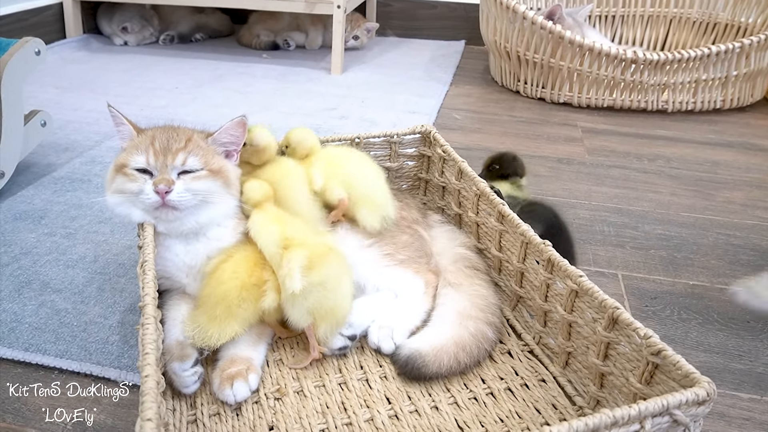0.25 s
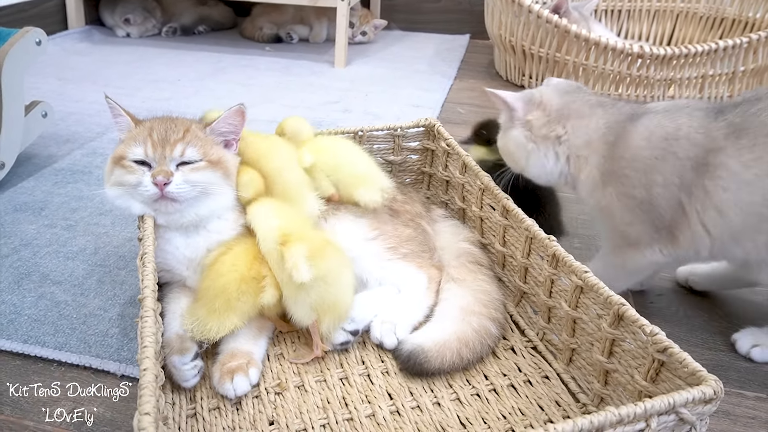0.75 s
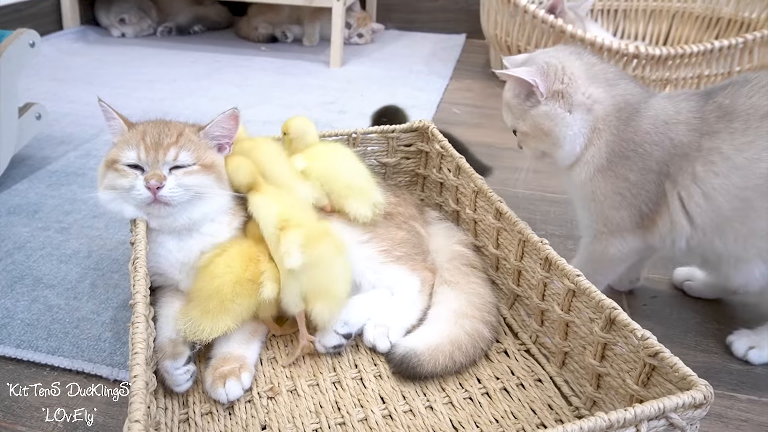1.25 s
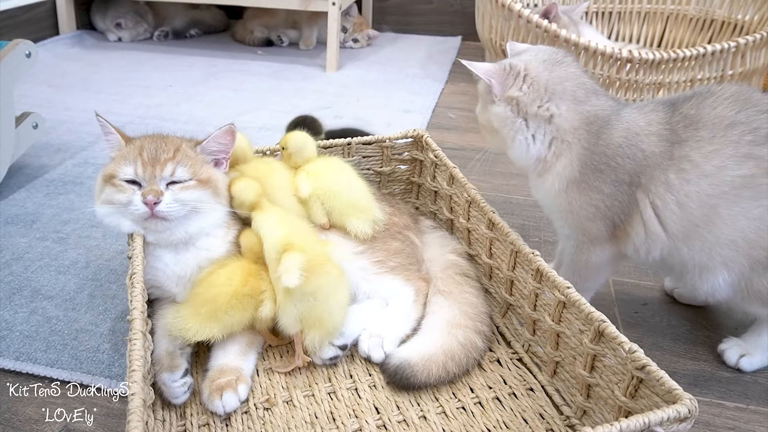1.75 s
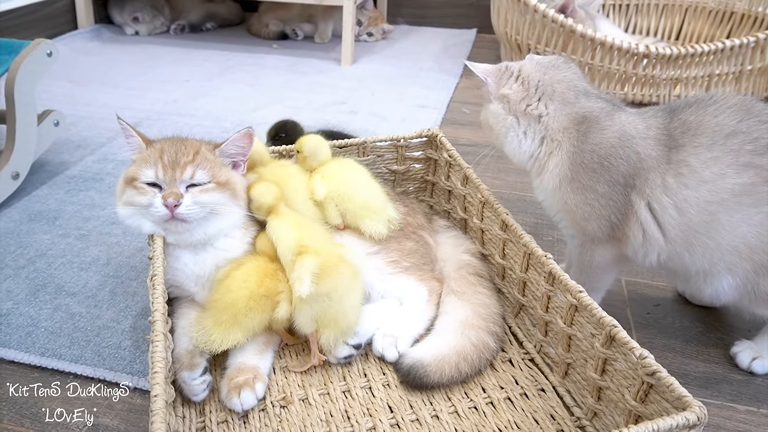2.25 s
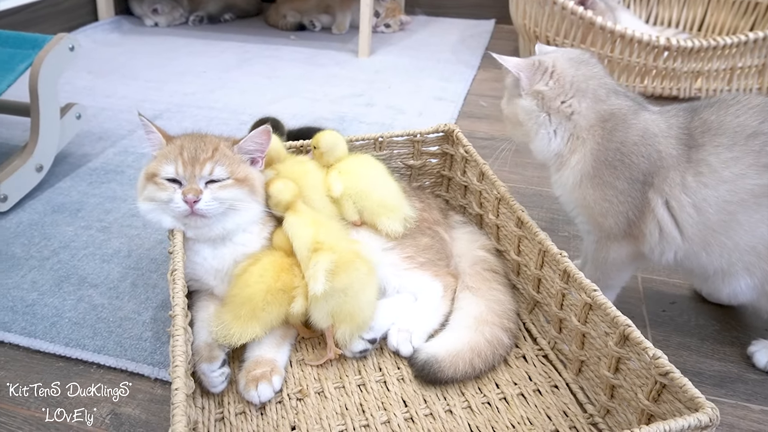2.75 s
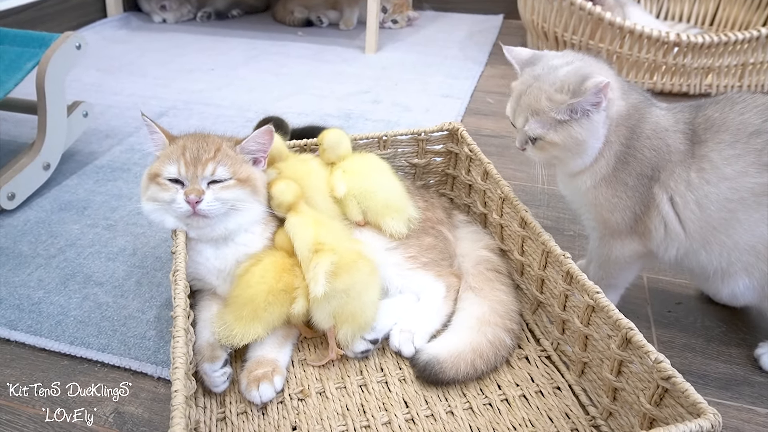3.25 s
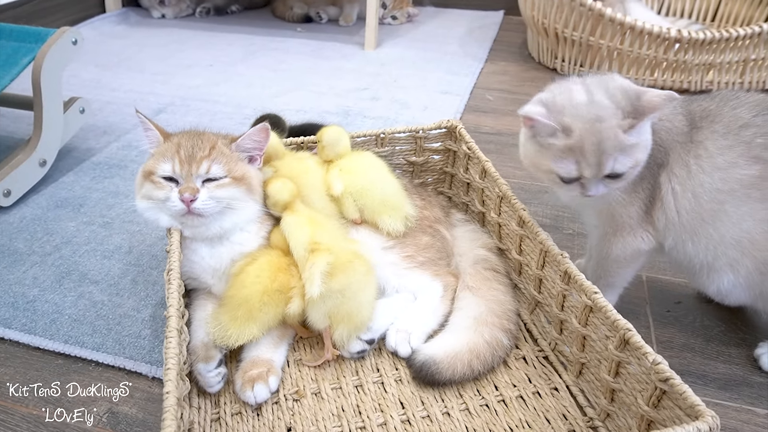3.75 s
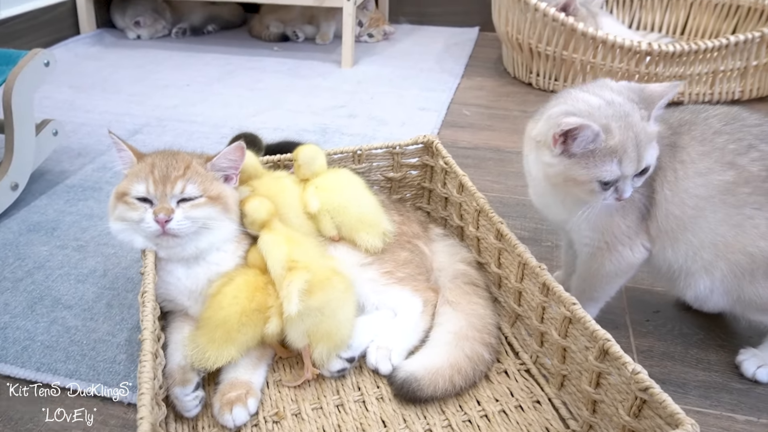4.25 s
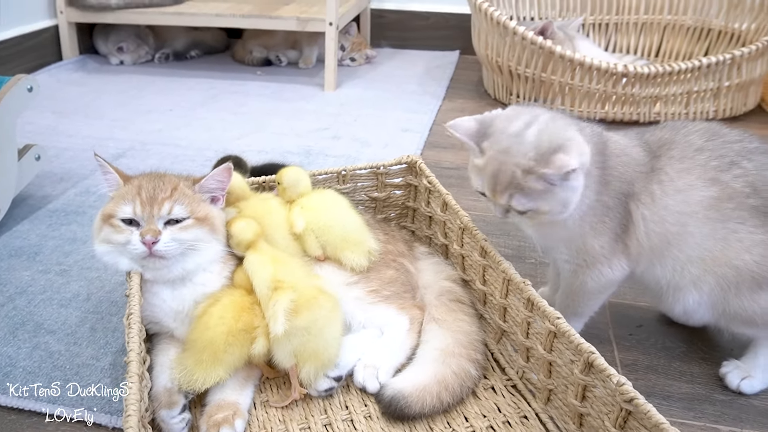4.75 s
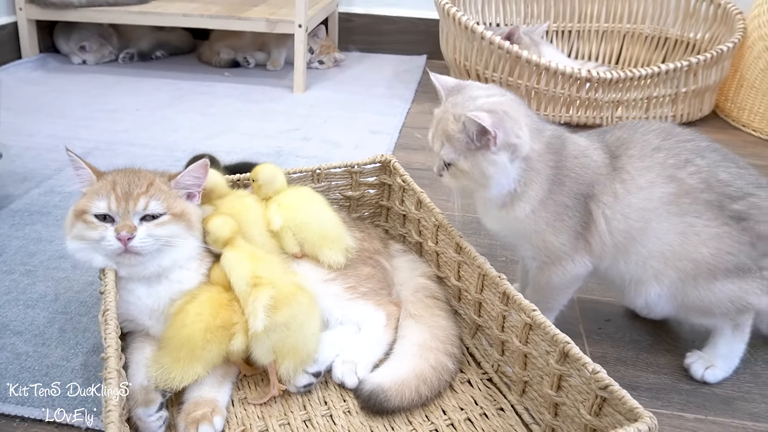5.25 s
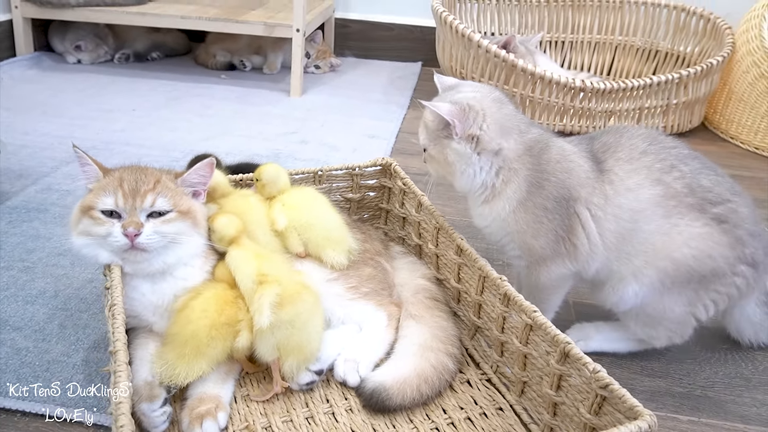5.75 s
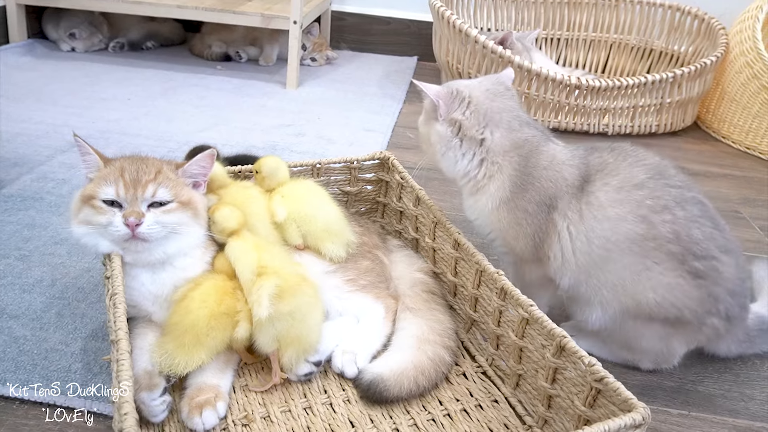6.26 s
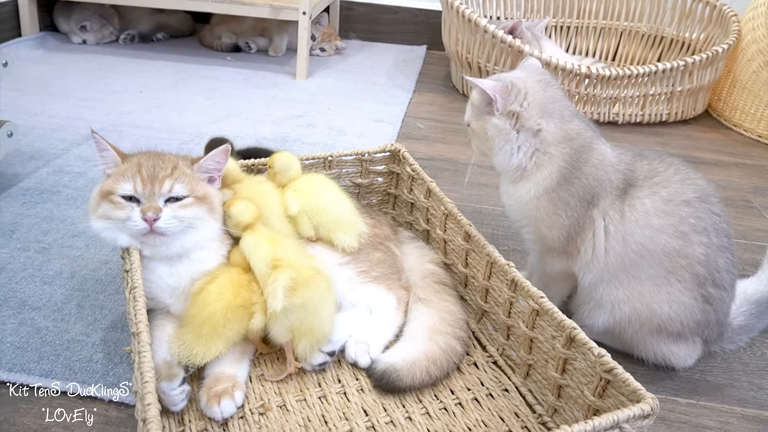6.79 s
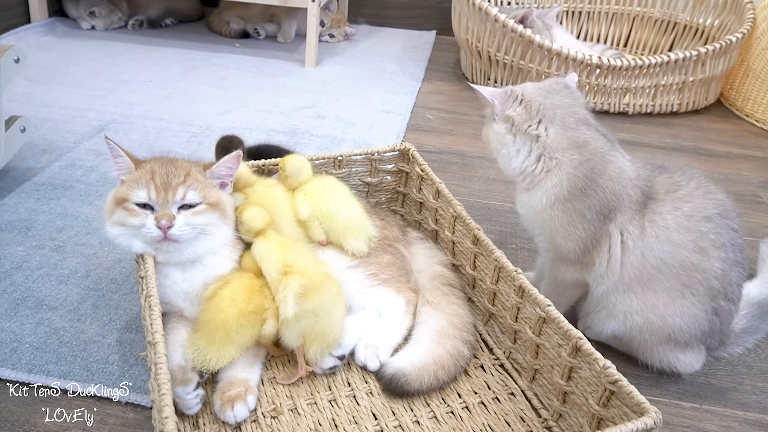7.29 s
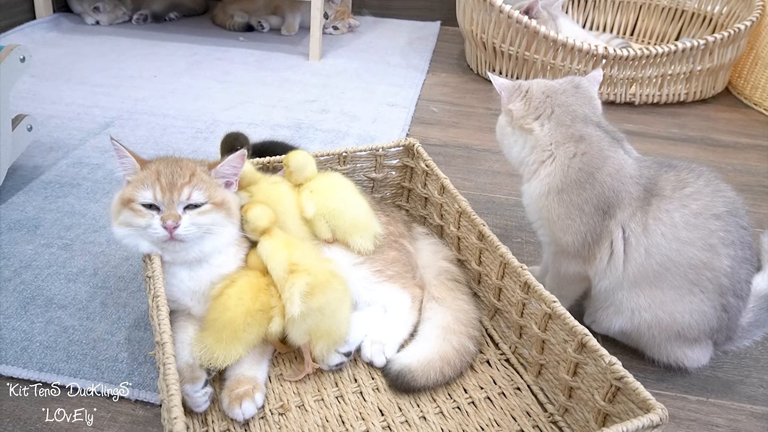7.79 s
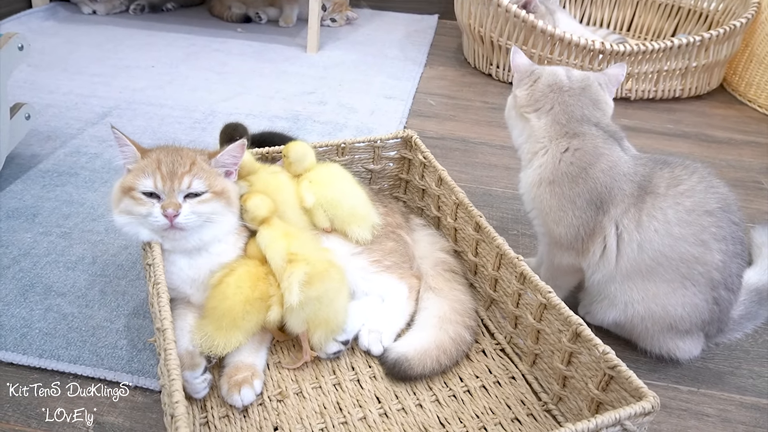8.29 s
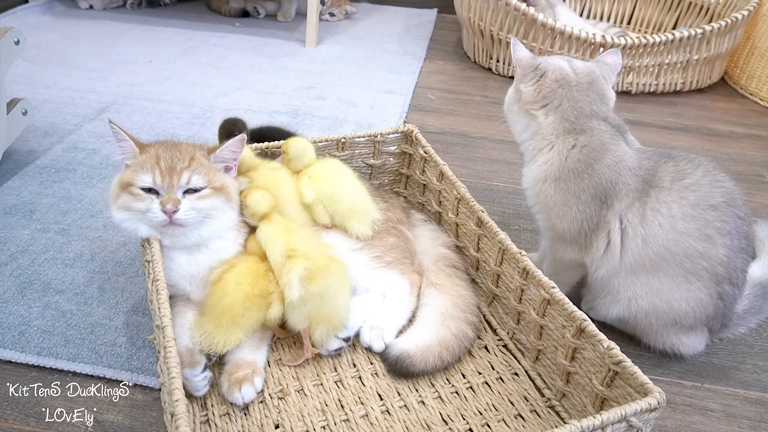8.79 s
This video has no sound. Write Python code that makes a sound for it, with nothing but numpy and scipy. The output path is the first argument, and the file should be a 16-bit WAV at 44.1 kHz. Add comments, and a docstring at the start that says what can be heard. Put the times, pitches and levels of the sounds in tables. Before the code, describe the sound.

In a hard-floored room with a low wavering hum, ducklings give tiny chirps over soft rustling. One hidden behind a wicker basket then peeps about five times a second, faint at first, soon loud, mostly heard as echo. Around six seconds it pauses for rustles, a dull double clatter and a thin jingle, then resumes. A sharp knock and more tinkling come near the end. The stereo microphone hears little direct peeping.

```python
"""A low wavering hum, a rumble and a hush fill a hard-floored room, with feet and fur stirring as flickering noise.
Ducklings chirp at once, in short hooks of pitch, and wicker and claws tick as brief band-limited pushes.
Then a duckling behind a wicker basket peeps in two runs, as falling whistles with a breathy haze, mostly echo.
Scrapes of banded noise and dull decaying knocks join in; between the runs and near the end metal partials jingle,
and between the runs an object clatters twice, as noise ringing its modes."""
import sys
import numpy as np
from scipy import signal
from scipy.fft import rfft, irfft, next_fast_len
from scipy.io import wavfile
from scipy.ndimage import uniform_filter1d

SR = 44100
rng = np.random.default_rng(int(sys.argv[2]) if len(sys.argv) > 2 else 0)


def dump(signal):
    """Clip the signal to [-1, 1] and save it as 16-bit WAV at the path in sys.argv[1]."""
    limited = np.clip(np.atleast_2d(signal).T, -1, 1)
    pcm = np.round(limited * 32767).astype(np.int16)
    wavfile.write(sys.argv[1], SR, pcm)


N = 398207  # samples

# Event levels are those at the source, ahead of the direct and room gains in scene().

# Colour of the hush. Each row: frequency in Hz, relative density in dB per Hz.
HUSH_COLOUR = [(15, -57), (25, -17), (82, -1.5), (145, -3.5), (326, -12), (911, -12), (1940, -27.5),
               (2550, -34), (2760, -26), (3080, -31.5), (4250, -45), (5570, -39.5), (7310, -49),
               (16000, -33)]
HUSH_DB = -65  # mean level, wavering

# Slow levels of the low sounds. Each row: time in seconds, hum level in dB, rumble level in dB.
HUM_LEVELS = [(0, -64.5, -69), (.65, -60, -63.5), (1.1, -60.5, -68), (1.7, -61.5, -63), (2.5, -61.5, -67),
              (3, -65, -64.5), (3.5, -65.5, -66), (5, -71, -68), (5.7, -69.5, -67), (5.9, -61.5, -63),
              (6.5, -74.5, -66), (7.1, -88, -70.5), (7.6, -73.5, -62), (8.35, -64, -68), (9.03, -66, -64.5)]
HUM_HZ = 84  # mean pitch

# Colour of the rumble. Each row: frequency in Hz, relative density in dB per Hz.
RUMBLE_COLOUR = [(80, -15), (150, -1.5), (260, 7.5), (600, -4.5), (1200, -18.5)]

# Steady stirring of feet and fur. Each row: time in seconds, hiss level in dB, scuff level in dB.
STIRRING = [(0, -63, -67.5), (.2, -65.5, -60.5), (.9, -69.5, -70), (1.3, -68.5, -61.5), (2, -72, -65),
            (2.5, -68.5, -70.5), (3.3, -68.5, -67.5), (3.8, -66.5, -70), (4.12, -58.5, -65.5),
            (4.5, -62, -63), (5.1, -66.5, -68), (5.65, -70, -72), (6, -61.5, -61.5), (6.5, -68, -67),
            (7.1, -65.5, -64), (7.7, -76, -64.5), (8.3, -64.5, -64.5), (9.03, -63, -64.5)]

# Single rustles above the stirring. Each row: start in seconds, hiss level in dB, scuff level in dB, hold in seconds.
RUSTLES = [(0.314, -58, -58.5, .03), (0.456, -59, -64, .02), (0.49, -60.5, -60.5, 0.087),
           (0.616, -62, -58.5, 0.047), (1.314, -59, -60, 0.014), (.69, -71, -62, .03),
           (1.482, -61.5, -65, .02), (2.39, -64, -71, .04), (4.764, -69, -73, 0.089),
           (1.74, -66.5, -63.5, 0.13), (2.923, -59, -57, 0.01), (5.367, -59, -63, 0.063),
           (5.702, -52.5, -69, 0.091), (6.017, -51, -61, 0.07), (6.35, -67, -82, 0.044),
           (6.578, -62, -58, .05), (6.758, -54.5, -59, 0.048), (7.216, -66.5, -59.5, 0.09),
           (7.943, -71, -60, 0.015), (8.419, -60, -60.5, 0.05), (8.575, -61, -65.5, 0.04),
           (8.856, -55, -74, .04), (8.993, -56, -58.5, .03)]
RUSTLE_ATTACK_S, HISS_T60_S, SCUFF_T60_S = 0.01, 0.35, 0.52

# Colours of the bright and dull parts of a rustle. Each row: frequency in Hz, relative density in dB per Hz.
HISS_COLOUR = [(1180, -40.5), (2000, -20), (2740, -2), (3940, -1), (4820, -2), (6470, -4), (15100, -6.5),
               (16000, -19.5)]
SCUFF_COLOUR = [(400, 2.5), (900, 5.5), (1600, 4.5), (3000, 7), (5000, -24.5)]

# Short chirps. Each row: start in seconds, level in dB, first, middle and last pitch in Hz, length in seconds,
# level of the octave below in dB relative to the chirp.
CHIRPS = [(.002, -47, 3430, 4330, 4600, .03, -13), (0.167, -61, 2280, 2140, 2100, 0.042, -30),
          (0.318, -51, 3480, 4150, 4580, .026, -3.5), (1.553, -49, 4120, 4360, 4380, 0.018, -30.5),
          (1.665, -52, 3700, 3650, 3500, 0.011, -34), (1.864, -47, 2230, 2490, 2650, 0.0085, -26),
          (1.875, -53, 3870, 4400, 4600, 0.014, -30), (4.223, -51.5, 3340, 3580, 3420, 0.023, -25),
          (4.276, -50, 3530, 3820, 3670, 0.024, -27), (1.068, -69, 3210, 3080, 2950, 0.027, -34),
          (6.515, -55.5, 3230, 3110, 2980, 0.056, -30), (7.055, -48, 3310, 3120, 3000, 0.058, -30),
          (6.6, -56.5, 2900, 2744, 2560, 0.087, -32), (6.895, -55.5, 3200, 3000, 2800, 0.028, -26),
          (7.755, -54.5, 3360, 3600, 3580, 0.032, -24), (7.821, -49.5, 3380, 3980, 3360, 0.019, -35),
          (7.892, -52, 3240, 3840, 3300, .03, -30)]

# Dry ticks of wicker and claws. Each row: start in seconds, peak in dB, centre in Hz,
# width in Hz of each of two resonances in series.
TICKS = [(0.504, -33, 10000, 9000), (.328, -45, 11500, 5000), (1.335, -42, 11000, 7000),
         (1.188, -34.5, 2340, 3000), (2.522, -42, 1200, 2380), (2.5203, -45, 9000, 6000),
         (2.761, -40.5, 700, 1400), (2.932, -51, 5000, 9000), (3.697, -37.5, 630, 1330),
         (7.22, -47, 1500, 1500), (7.32, -40, 4600, 2500), (7.856, -40, 10600, 3500),
         (7.87, -44, 13000, 5000), (7.97, -50, 11000, 3000), (7.971, -43, 1700, 1200),
         (8.006, -45, 9000, 12000), (8.312, -44, 5400, 900), (8.602, -36.5, 9800, 8000),
         (8.884, -46.5, 1240, 500)]

# Falling peeps. Each row: start in seconds, level in dB, first pitch in Hz ahead of the flutter, length in seconds.
PEEPS = [(0.592, -53, 2974, 0.094), (0.703, -48.5, 3086, 0.071), (0.832, -48.5, 2974, 0.061),
         (1.073, -46.5, 2952, 0.066), (1.291, -40, 2993, 0.092), (1.475, -32.5, 3222, 0.084),
         (1.683, -28.5, 3267, 0.075), (1.889, -31, 3275, 0.073), (2.09, -32, 3180, 0.091),
         (2.311, -28, 3196, 0.068), (2.513, -28, 3242, 0.074), (2.734, -24, 3270, 0.071),
         (2.944, -26, 3243, 0.076), (3.196, -24.5, 3267, 0.078), (3.422, -24.5, 3250, .079),
         (3.634, -25, 3220, 0.083), (3.844, -25.5, 3260, 0.083), (4.083, -24, 3290, 0.083),
         (4.302, -26.5, 3270, 0.086), (4.521, -25.5, 3248, 0.078), (4.76, -24, 3314, 0.075),
         (5.015, -27, 3292, .09), (5.259, -26.5, 3283, 0.072), (6.396, -50.5, 2790, .059),
         (6.514, -48, 2900, 0.0795), (6.913, -35.5, 2886, .077), (7.053, -38, 2894, 0.1),
         (7.268, -29, 3210, 0.061), (7.481, -27.5, 3218, 0.077), (7.684, -27, 3233, 0.078),
         (7.892, -28, 3282, 0.089), (8.139, -26.5, 3305, 0.076)]
# Share of the way down to LOW_HZ covered by the end; a curve under 1 falls fastest at first.
PEEP_DROP, DROP_CURVE, LOW_HZ = 0.52, 0.95, 2099
# Haze relative to the tone: softer peeps are breathier, up to a limit.
FULL_VOICE_DB, HAZE_DB, HAZE_PER_DB, HAZE_TOP_DB = -23, -20.5, 4, 1.5

# Short scrapes. Each row: start in seconds, level in dB, centre in Hz, width in Hz, 60 dB decay time in seconds.
SCRAPES = [(.62, -53, 980, 354, 0.81), (.625, -54, 2000, 400, 0.58), (1.225, -51.5, 2830, 1800, 0.45),
           (1.321, -46, 3380, 3000, 0.42), (1.325, -56, 7050, 1200, 0.38), (6.052, -56, 1950, 400, 0.33),
           (6.06, -54, 1120, 350, 0.98), (6.585, -55.5, 4500, 5000, 0.85), (6.771, -52, 4830, 1520, 0.57),
           (8.855, -51.5, 4520, 3000, 0.97)]

# Dull knocks. Each row: start in seconds, level in dB, mean ring in Hz, 60 dB decay time in seconds,
# room send in dB relative to the near sound.
KNOCKS = [(3, -47.5, 420, 0.037, -11), (2.602, -52, 520, 0.065, -5), (3.054, -51.5, 176, 0.26, 2),
          (3.175, -59, 160, 0.27, 11.5), (3.073, -51, 320, 0.2, -3), (5.469, -53.5, 160, 0.18, 6),
          (5.58, -48, 164, 0.26, -10), (5.475, -49.5, 253, 0.26, -2.5), (8.168, -23, 490, 0.019, -9.5),
          (8.252, -42, 460, 0.036, -6), (8.686, -42.5, 354, 0.03, 1.5), (5.772, -44, 310, 0.21, -7),
          (5.773, -46.5, 590, .15, -4)]

# Shakes of the metal. Each row: start in seconds, level in dB.
JINGLE_SHAKES = [(5.4394, -68), (5.7463, -63), (5.801, -51), (5.8232, -55), (5.94, -61), (5.9983, -59),
                 (6.0553, -58), (6.11, -53.5), (6.1554, -68), (6.3126, -64), (6.3894, -62), (8.2117, -66),
                 (8.2397, -66), (8.338, -64), (8.376, -61), (8.4442, -55), (8.4694, -56), (8.6, -67)]
# Partials of the metal. Each row: frequency in Hz, mean relative level in dB.
JINGLE_PARTIALS = [(7348, 1), (9141, -8), (12328, -13), (12909, -10), (13308, -11), (15089, -13)]

# Two far clatters of one object. Each row: start in seconds, peak in dB, tilt in dB per octave (up = brighter).
CLATTERS = [(5.774, -38, 0.5), (6.051, -46, 3.5)]
# Modes of that object. Each row: frequency in Hz, width in Hz, relative level in dB ahead of the tilt.
CLATTER_MODES = [(297, 107, 10), (582, 110, 4.5), (870, 84, -7), (1483, 67, 1.5), (1800, 400, -0.5),
                 (2130, 65, -20), (2550, 22, -20), (2900, 48, -20)]

# Likeness of the two channels in noise. Each row: frequency in Hz, left-right correlation (no unit).
LIKENESS = [(60, 1), (300, 0.72), (800, 0.17), (2000, 0.36), (6000, 0.16), (14000, 0.052)]

# Decay of the room. Each row: frequency in Hz, 60 dB decay time in seconds.
ROOM_T60 = [(200, 0.46), (1000, 0.66), (3000, 0.55), (6500, 0.8), (14000, 0.17)]

RIGHT_DB, TOP_HZ = 0.2, 15800  # level of right over left; upper band edge


def undb(db):
    """Level in dB as an amplitude ratio."""
    return 10 ** (np.asarray(db) / 20)


def curve(table, k):
    """Linear interpolation in time of column k, sample by sample."""
    table = np.array(table)
    return np.interp(np.arange(N) / SR, table[:, 0], table[:, k])


def on_log(hz, table):
    """Linear interpolation of a spectrum table on a log-frequency axis."""
    table = np.array(table)
    return np.interp(np.log(np.maximum(hz, 1)), np.log(table[:, 0]), table[:, 1])


def add(track, s, x):
    """Superposition: x is summed into the track from time s."""
    i = int(s * SR)
    track[..., i:i + x.shape[-1]] += x[..., :N - i]


def noise(spectrum, size=N):
    """Filtered Gaussian noise of rms 1; mid and side shares set the correlation, highest in the bass."""
    n = next_fast_len(size)
    hz = np.arange(n // 2 + 1) * SR / n
    likeness = np.clip(on_log(hz, LIKENESS), 0, 1)
    white = rfft(rng.standard_normal((2, n)))
    mid, side = white * undb(on_log(hz, spectrum)) * np.sqrt([1 + likeness, 1 - likeness])
    x = irfft(np.array([mid + side, mid - side]), n)[:, :size]
    return x / np.sqrt(np.mean(x ** 2))


def walk(rate):
    """Random modulation: values held for 1 / rate seconds and smoothed twice, with a spread near 1."""
    k = int(SR / rate)
    steps = np.repeat(rng.standard_normal(N // k + 1), k)
    return 1.32 * uniform_filter1d(uniform_filter1d(steps, k), k)[:N]


def ring(x, hz, width_hz):
    """A single resonance has unit gain at its centre and a bandwidth set by its damping."""
    return signal.lfilter(*signal.iirpeak(hz, hz / width_hz, SR), x)


def room(x, build_s=0.004, early_db=0.0, early_t60=0.3):
    """Reverberation by convolution: early echoes off floor and basket, and a tail that decays octave by octave."""
    t = np.arange(SR) / SR
    tail = 0
    for hz in 125 * 2. ** np.arange(8):
        band = [(hz / 2, -60), (hz / np.sqrt(2), -3), (hz, 0), (hz * np.sqrt(2), -3), (hz * 2, -60)]
        decay = undb(-60 * t / on_log(hz, ROOM_T60))
        tail = tail + np.sqrt(min(hz, 9000.)) * noise(band, size=SR) * decay
    start_rms = np.sqrt(np.mean(tail[:, :400] ** 2))
    early = start_rms * undb(early_db - 60 * t / early_t60) * rng.standard_normal(SR)  # alike in both channels
    tail = (tail + early) * (1 - np.exp(-t / build_s))
    tail = tail / np.sqrt(np.mean(np.sum(tail ** 2, axis=1)))  # unit energy, averaged over channels
    return signal.fftconvolve(x[None], tail, axes=1)[:, :N]


def hush():
    """Broadband background noise has a steady colour and a slowly wavering level."""
    return undb(HUSH_DB + 0.32 * walk(2.5)) * noise(HUSH_COLOUR)


def hum():
    """Frequency and amplitude modulation make a low sine waver, over a dull band of noise."""
    phase = 2 * np.pi * np.cumsum(HUM_HZ + 2.5 * walk(12)) / SR
    tone = undb(curve(HUM_LEVELS, 1) + 1.2 * walk(9)) * np.sin(phase)
    return tone + undb(curve(HUM_LEVELS, 2)) * noise(RUMBLE_COLOUR)


def rustle():
    """Fast random modulation makes noise grainy; the powers of rustles and steady stirring add."""
    power = undb([curve(STIRRING, 1), curve(STIRRING, 2)]) ** 2
    t = np.arange(SR // 2) / SR
    for s, hiss_db, scuff_db, hold in RUSTLES:
        fade_db = -60 * np.maximum(t - RUSTLE_ATTACK_S - hold, 0) / [[HISS_T60_S], [SCUFF_T60_S]]
        rise = np.minimum(t / RUSTLE_ATTACK_S, 1)
        add(power, s, (rise * undb(fade_db + [[hiss_db], [scuff_db]])) ** 2)
    hiss_level, scuff_level = np.sqrt(power)
    hiss = hiss_level * undb(0.98 * walk(150)) * noise(HISS_COLOUR)
    scuff = scuff_level * undb(2.06 * walk(60)) * noise(SCUFF_COLOUR)
    return hiss * undb([[-0.7], [0.7]]) + scuff  # hiss leans right


def whistle(hz, shape, overtone_db):
    """A syrinx tone is nearly a sine, with a weak second harmonic; phase is the integral of frequency."""
    phase = 2 * np.pi * (np.cumsum(hz) / SR + rng.random())
    overtone = shape ** 0.67 * undb(overtone_db) * np.sin(2 * phase)
    return shape * np.sin(phase) + overtone, phase


def chirps():
    """A parabolic frequency glide through three pitches, with a subharmonic an octave below."""
    out = np.zeros(N)
    for s, db, first_hz, middle_hz, last_hz, length, below_db in CHIRPS:
        u = np.linspace(0, 1, int(length * SR))
        hz = np.polyval(np.polyfit([0, 0.5, 1], [first_hz, middle_hz, last_hz], 2), u)
        shape = np.abs(np.sin(np.pi * u)) ** 0.23
        tone, phase = whistle(hz, shape, -24.5)
        octave_below = undb(below_db) * shape * np.sin(phase / 2)
        add(out, s, undb(db) * (tone + octave_below))
    return out


def ticks():
    """Impulse excitation: a sharp push with a millisecond of crackle drives two like resonances in series."""
    out, t = np.zeros(N), np.arange(512) / SR
    for s, db, hz, width_hz in TICKS:
        crackle = 0.35 * rng.standard_normal(len(t)) * np.exp(-t / 0.00044)
        x = ring(ring((t == 0) + crackle, hz, width_hz), hz, width_hz)
        add(out, s, undb(db) * x / np.abs(x).max())
    return out


def peeps():
    """A tone swells, glides down and fades; unsteadiness roughens it and resonant breath noise adds haze."""
    out = np.zeros(N)
    flutter, tremble, breath = walk(260), walk(180), rng.standard_normal(N)
    for s, db, first_hz, length in PEEPS:
        u = np.linspace(0, 1, int(length * SR))
        here = slice(int(s * SR), int(s * SR) + len(u))
        swell = np.clip(u / 0.24, 0, 1) ** 0.83
        fade = np.exp(-np.clip(u - 0.3, 0, 1) / 0.31) * np.clip((1 - u) / 0.023, 0, 1)
        shape = swell * fade * undb(1.44 * tremble[here])
        hz = first_hz - PEEP_DROP * (first_hz - LOW_HZ) * u ** DROP_CURVE + 80 * flutter[here]
        overtone_db = -29.0 + 0.19 * (db - FULL_VOICE_DB)  # louder peeps are brighter
        tone, _ = whistle(hz, shape, overtone_db)
        haze_hz = 1.03 * first_hz
        haze = ring(ring(breath[here], haze_hz, 450), haze_hz, 450)
        haze = haze * np.clip(u / 0.029, 0, 1) * np.exp(-u / 0.36)
        haze_db = min(HAZE_DB + HAZE_PER_DB * (FULL_VOICE_DB - db), HAZE_TOP_DB)
        add(out, s, undb(db) * (tone + undb(haze_db) * haze))
    return out


def scrapes():
    """Band-limited noise rises quickly and decays exponentially."""
    out, t = np.zeros((2, N)), np.arange(SR // 2) / SR
    for s, db, hz, width_hz, t60 in SCRAPES:
        below = [(max(hz - 2 * width_hz, 50), -30), (hz - width_hz / 2, -3)]
        above = [(hz + width_hz / 2, -3), (hz + 2 * width_hz, -30)]
        band = noise(below + [(hz, 0)] + above, size=len(t))
        add(out, s, undb(db - 60 * t / t60) * (1 - np.exp(-t / 0.0029)) * band)
    return out


def knocks():
    """A soft blow on a hollow thing excites a damped, slightly unsteady tone; near and far parts."""
    near, far, t = np.zeros(N), np.zeros(N), np.arange(SR // 2) / SR
    for s, db, hz, t60, room_db in KNOCKS:
        cycles = hz * np.cumsum(1 + 0.04 * walk(60)[:len(t)]) / SR
        onset = 1 - np.exp(-t * hz * 2.8)  # deeper rings start more slowly
        x = undb(db - 60 * t / t60) * onset * np.sin(2 * np.pi * cycles)
        add(near, s, x)
        add(far, s, undb(room_db) * x)
    return near, far


def jingle():
    """Each shake excites the inharmonic partials of thin metal in a new mix, with a common decay."""
    out, t = np.zeros(N), np.arange(SR // 3) / SR
    for s, db in JINGLE_SHAKES:
        tones = 0
        for (hz, partial_db), m in zip(JINGLE_PARTIALS, rng.standard_normal(len(JINGLE_PARTIALS))):
            # the random m shifts both level and phase
            tones = tones + undb(partial_db + 2 * m) * np.sin(2 * np.pi * (hz * t + 3 * m))
        add(out, s, undb(db - 60 * t / 0.22) * (1 - np.exp(-t / 0.004)) * tones)
    return out


def clatters():
    """Modal synthesis: a short scrape of noise rings the object's resonances in parallel."""
    out, t = np.zeros(N), np.arange(8192) / SR
    for s, db, tilt_db in CLATTERS:
        push = rng.standard_normal(len(t)) * np.exp(-t / 0.042)
        x = 0
        for hz, width_hz, mode_db in CLATTER_MODES:
            x = x + undb(mode_db + tilt_db * np.log2(hz / 1000)) * ring(push, hz, width_hz)
        add(out, s, undb(db) * x / np.abs(x).max())
    return out


def scene():
    """Direct sound and reverberation superpose, with the stereo noises added dry."""
    chirp, tick, peep = chirps(), ticks(), peeps()
    knock, far_knock = knocks()
    metal, clatter = jingle(), clatters()
    # the basket hides the peeping duckling, so the room carries most of it
    direct = undb(-11) * peep + chirp + tick + knock + metal + undb(4) * clatter + hum()
    to_room = undb(1.0) * peep + chirp + undb(-11) * tick
    to_room = to_room + far_knock + undb(-5.5) * metal + undb(5.5) * clatter
    return direct + room(to_room) + rustle() + scrapes() + hush()


def record(dry):
    """Channel gains make the right slightly louder, and a steep low-pass filter limits the band."""
    balanced = dry * undb([[-RIGHT_DB / 2], [RIGHT_DB / 2]])
    low_pass = signal.ellip(10, 0.2, 70, TOP_HZ, fs=SR, output="sos")
    return signal.sosfilt(low_pass, balanced)


dry = scene()
out = record(dry)
dump(out)
```